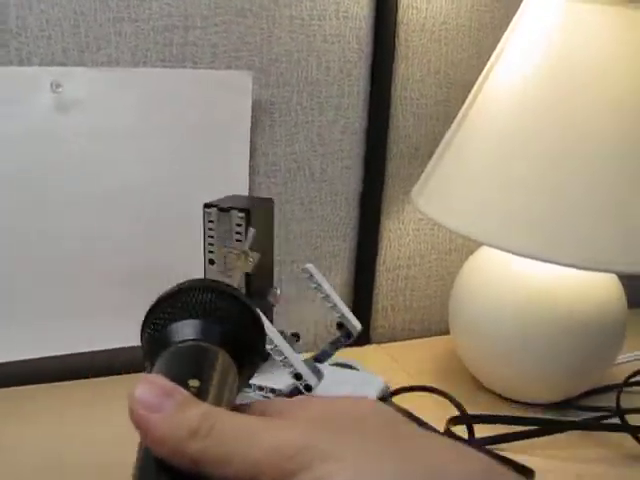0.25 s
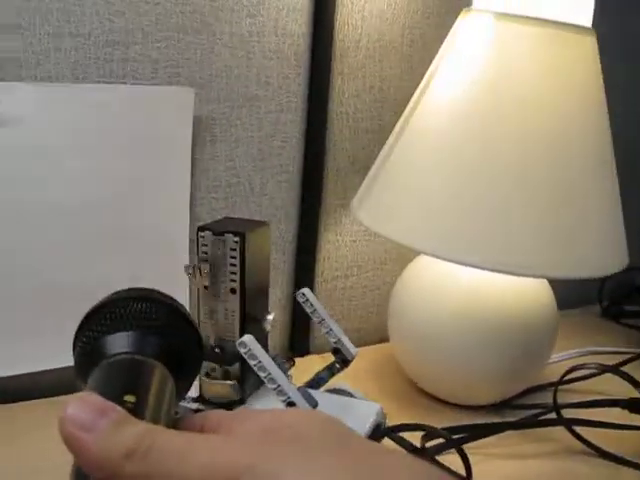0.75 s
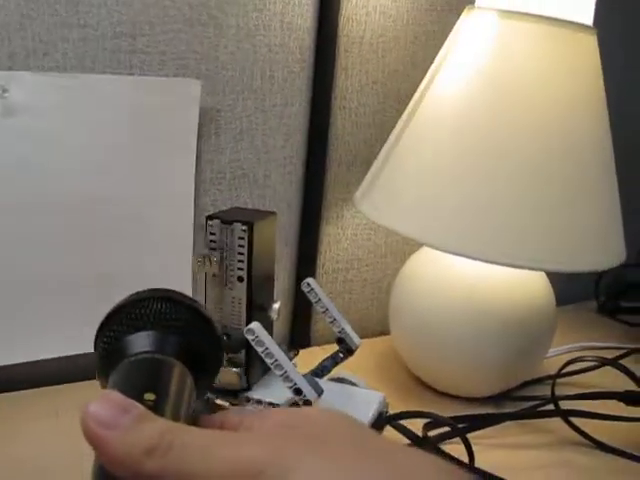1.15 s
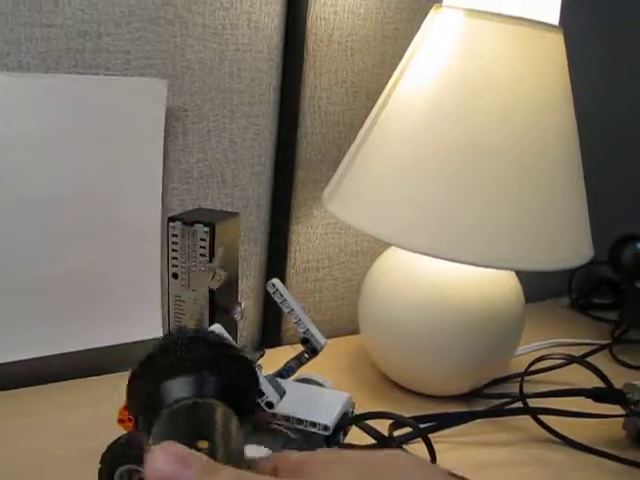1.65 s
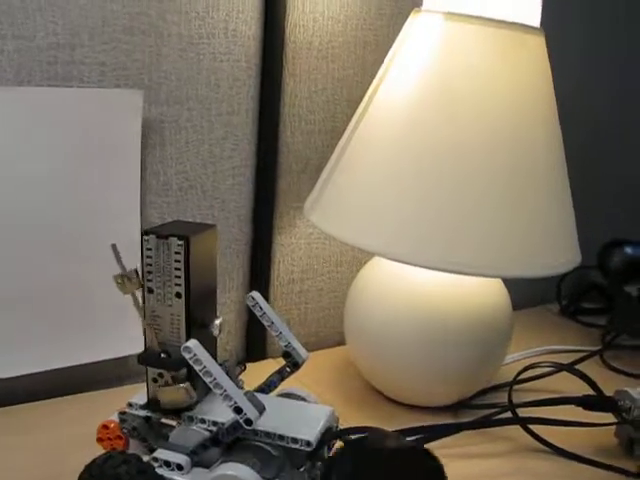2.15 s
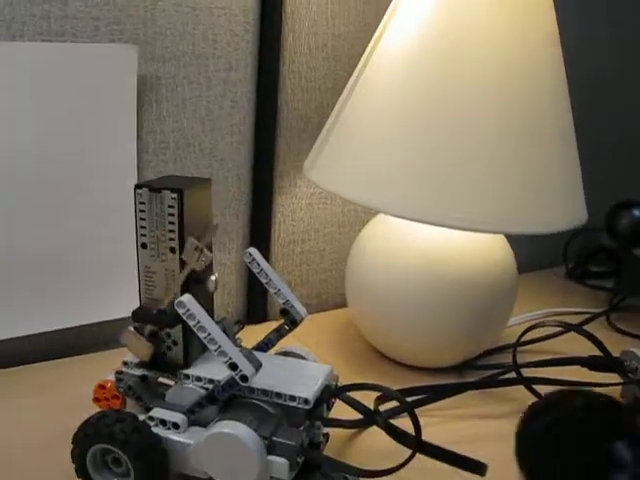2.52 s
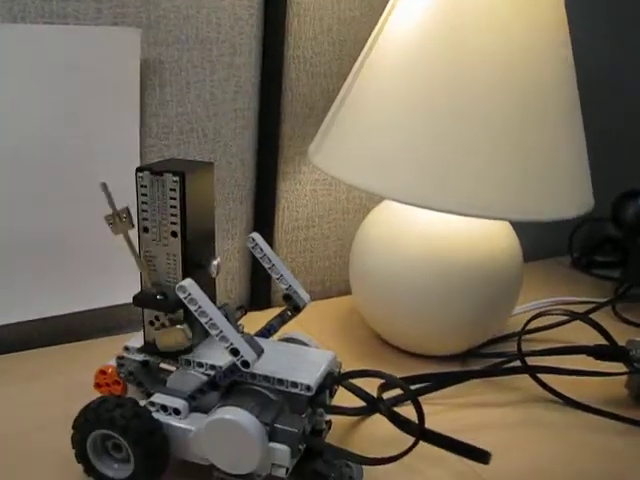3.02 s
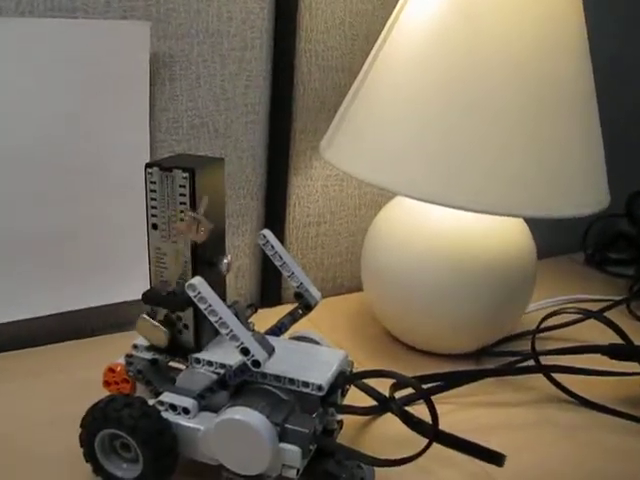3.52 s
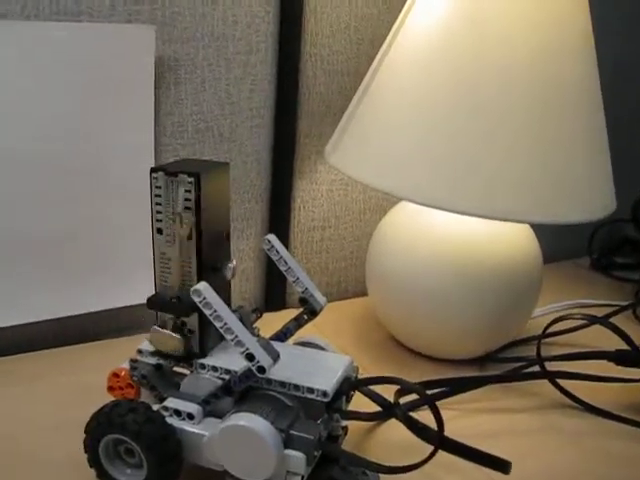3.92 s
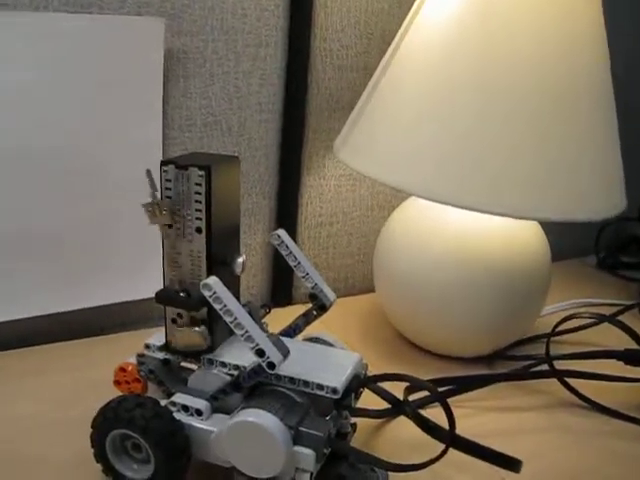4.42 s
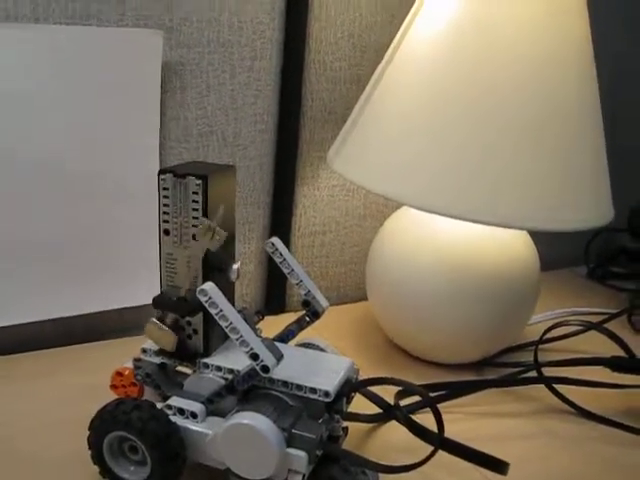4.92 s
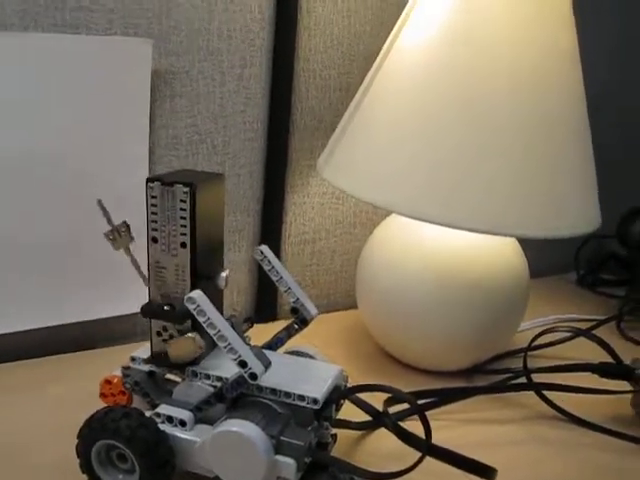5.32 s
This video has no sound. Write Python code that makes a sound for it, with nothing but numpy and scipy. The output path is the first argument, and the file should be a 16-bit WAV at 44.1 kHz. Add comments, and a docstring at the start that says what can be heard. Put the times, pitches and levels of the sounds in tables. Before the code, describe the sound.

A mechanical metronome ticks evenly in a quiet office while a small robot's geared motors rattle briefly and run down.

```python
"""A quiet office, where a small plastic robot rolls over a desk with a wind-up metronome on top.
Each escapement stroke excites the damped modes of the metronome's case: a slightly lopsided tick.
Tooth impacts in the robot's two geared motors force its chassis to rattle; they run down and stop
within the first second. A hand adds faint knocks and bumps, and ventilation noise and the hum
of beating fans lie under it all."""
import sys
import numpy as np
from scipy import signal
from scipy.fft import rfft, irfft
from scipy.io import wavfile
from scipy.ndimage import uniform_filter1d

SR = 44100
rng = np.random.default_rng(int(sys.argv[2]) if len(sys.argv) > 2 else 0)


def store_pcm(level_fs):
    """Save levels as 16-bit WAV."""
    pcm = np.round(np.clip(level_fs, -1, 1) * 32767).astype(np.int16)
    wavfile.write(sys.argv[1], SR, np.atleast_2d(pcm).T)


N = 245195
TIME = np.arange(N) / SR
DRIVE_TIME = TIME[:SR]  # the first second, in which the motors run


def gain_of(db):
    """Amplitude ratio of a level in decibels."""
    return 10 ** (np.asarray(db) / 20)


def unit_rms(x):
    """Normalisation to rms 1."""
    return x / np.sqrt(np.mean(x ** 2) + 1e-20)


def value_at(points, hz):
    """Interpolation on a logarithmic frequency axis."""
    f, value = np.transpose(points)
    return np.interp(np.log(hz + 1), np.log(f + 1), value)


def add(mix, start_s, sound):
    """Superposition of a sound on the mix."""
    part = mix[max(round(start_s * SR), 0):][:len(sound)]
    part += sound[:len(part)]


def decay(t, t60):
    """Exponential damping: 60 dB in t60 seconds."""
    return np.exp(-np.log(1000) * t / t60)


def coloured(x, spectrum):
    """Spectral shaping, at rms 1."""
    gain = gain_of(value_at(spectrum, np.fft.rfftfreq(len(x), 1 / SR)))
    return unit_rms(irfft(rfft(x) * gain, len(x)))


def resonate(x, hz, width_hz):
    """Heterodyne resonance of gain 1 that can glide: shift to 0 Hz, smooth twice, shift back."""
    carrier = np.exp(2j * np.pi * np.cumsum(hz * np.ones(len(x))) / SR)
    pole = np.exp(-2 * np.pi * width_hz / SR)
    baseband = signal.lfilter([(1 - pole) ** 2], np.poly([pole, pole]), x / carrier + 1e-18)
    return 2 * (carrier * baseband).real


def filtered(x, hz, kind, order=2):
    """Maximally flat low-pass or high-pass."""
    return signal.sosfilt(signal.butter(order, min(hz, SR / 2 - 1), kind, fs=SR, output="sos"), x)


def wander(samples):
    """Slow random modulation: one second of twice-averaged noise at rms 1."""
    noise = rng.standard_normal(len(DRIVE_TIME))
    return unit_rms(uniform_filter1d(uniform_filter1d(noise, samples), samples))


# escapement strokes: t/s, level/dB, relative level of the pendulum weight's ring/dB
STROKES = [(0.2509, -2, -49.5), (0.8036, -1, -31.5), (1.3115, -1.8, -57), (1.8906, -1.5, -46),
           (2.3979, -1.34, -49.5), (2.9764, -2, -44.5), (3.4891, -1.5, -27.5), (4.0648, -1.8, -46),
           (4.5816, -2.5, -48.5), (5.1553, -1.5, -27)]
# first hard snap of a stroke: f/Hz, level/dB, duration/s
SNAP_PULSES = [(3371, -7.5, 0.0012), (5443, -12, 0.002)]
# modes of the case and works: f/Hz, level/dB, T60/s
CASE_MODES = [(1215, -14, 0.017), (1313.5, -8, 0.015), (1368, -17, 0.019), (2085, -19.5, 0.033),
              (2065, -22, 0.017), (2384, -10, 0.0074), (2563, -14.5, 0.013), (2916, -57.5, 0.013),
              (3074, -16, 0.01), (3414, -14, 0.0094), (3620, -29.5, 0.011), (3770, -23.5, 0.0255),
              (3810, -11.5, 0.0081), (4760, -18, 0.024), (4965, -4.5, 0.0046), (5200, -37.5, 0.027),
              (5264, -19.5, 0.014), (5500, -5.5, 0.007), (6170, -22.5, 0.0085), (6750, -36.5, 0.026),
              (7190, -26.5, 0.02), (8480, -30, 0.014), (8900, -31, 0.022), (9300, -25.5, 0.0059),
              (10060, -39.5, 0.025), (11020, -38, 0.0169), (12140, -34.5, 0.021), (14000, -36.5, 0.007)]
# friction of the pallet on the escape wheel: f/Hz, relative spectral level/dB
SCRAPE_SPECTRUM = [(200, -24.5), (600, -14), (850, -4.5), (1600, -13.5), (2500, 6.5), (5000, 0.5),
                   (7000, 0.5), (11000, -6.5), (16000, -19)]


def metronome(scatter_db=0.07, detune=0.0038, weight_hz=2046, scrape_db=-26):
    """Impact excitation: each stroke snaps, scrapes and rings damped modes, never quite alike."""
    out, t = np.zeros(N), np.arange(SR // 8) / SR
    snap = sum(gain_of(db) * np.sin(np.pi * np.minimum(t / length, 1)) ** 2 * np.sin(2 * np.pi * hz * t)
               for hz, db, length in SNAP_PULSES)
    hz, db, t60 = np.transpose(CASE_MODES)[:, :, None]
    polarity = (-1) ** np.arange(len(CASE_MODES))[:, None]  # neighbouring modes radiate in antiphase
    for start_s, stroke_db, weight_db in STROKES:
        louder, sharper = rng.standard_normal((2, len(CASE_MODES), 1))
        envelopes = gain_of(db + scatter_db * louder) * decay(t, t60)
        modes = polarity * envelopes * np.sin(2 * np.pi * hz * (1 + detune * sharper) * t)
        weight = gain_of(weight_db) * decay(t, t60=0.062) * np.sin(2 * np.pi * weight_hz * t)
        friction = coloured(rng.standard_normal(len(t)), SCRAPE_SPECTRUM)
        scrape = gain_of(scrape_db) * friction * decay(t, t60=0.036)
        ring = filtered(snap + modes.sum(0) - weight, 1000, "highpass")  # a small box radiates no bass
        tick = reflections(ring + scrape, db=-15, t60=0.034, delay_s=0.0018)
        add(out, start_s, gain_of(stroke_db) * tick)
    return out


START_RATE_HZ, TOP_RATE_HZ = 510, 600  # teeth meeting per second
FASTEST_S, COAST_S, STOP_S = 0.14, 0.338, 0.63  # at COAST_S the power is cut and the wheels run on


def tooth_rate(run_down_power=0.68):
    """Meshing frequency in Hz: a short rise, then friction slows the drive ever more steeply."""
    rising = np.interp(DRIVE_TIME, [0, FASTEST_S], [START_RATE_HZ, TOP_RATE_HZ])
    share_left = np.clip((STOP_S - DRIVE_TIME) / (STOP_S - FASTEST_S), 0, 1)
    return rising * share_left ** run_down_power


def gear_train(rate, wobble=0.025, uneven_db=3, chatter_gain=0.11, slide_gain=0.14):
    """Impact and friction: uneven tooth blows shake loose parts, and the flanks slide in between."""
    force, hiss = rng.standard_normal((2, len(rate)))
    teeth_passed = np.cumsum(rate * (1 + wobble * wander(samples=150))) / SR
    blows = np.diff(np.floor(teeth_passed), prepend=0) * gain_of(uneven_db * np.clip(force, -2, 2))
    chatter = signal.oaconvolve(blows, decay(TIME[:SR // 20], t60=0.0033))[:len(rate)]
    return blows + (chatter_gain * chatter + slide_gain * np.sqrt(rate / rate[0])) * hiss


# plastic gearboxes and chassis: f/Hz, bandwidth/Hz, relative level driven/dB, the same coasting/dB
CHASSIS_MODES = [(756, 46, -25, -14), (1493, 91, 0, 5.5), (2055, 120, -11, -1), (2760, 330, -2, -1),
                 (4030, 130, -1.5, 4.5), (4350, 156, -2, 8.5), (4850, 220, 0.5, -4), (5550, 170, -20, -0.5),
                 (6250, 140, -2, 4), (6830, 500, -1.5, -2.5), (7380, 1900, -7.5, -6.5),
                 (10010, 360, 0.5, 1.5), (10200, 320, 1.5, -6), (11600, 1200, -18, -13)]


def chassis(teeth, flex=0.0029, flicker_db=2.0):
    """Forced vibration: the teeth ring the flexing frame; other modes lead once the gears go slack."""
    slack = np.clip((DRIVE_TIME - COAST_S) / 0.05 + 0.5, 0, 1)
    out = np.zeros(len(teeth))
    for k, (hz, width_hz, driven_db, coasting_db) in enumerate(CHASSIS_MODES):
        db = driven_db + slack * (coasting_db - driven_db) + flicker_db * wander(samples=900)
        flexed_hz = hz * (1 + flex * wander(samples=1500))
        out += (-1) ** k * gain_of(db) * resonate(teeth, flexed_hz, width_hz)
    return unit_rms(out)


def rattle_envelope(rate, db=-37.5, cut_db=-3.5, rebound_db=-5.5, fade_power=1.4):
    """Backlash: the rattle follows the speed and dips as teeth part, at the power cut and after jolts."""
    dip_db = cut_db * np.exp(-((DRIVE_TIME - COAST_S) / 0.044) ** 2)
    for start_s, _, length, _ in GEAR_JOLTS:
        rebound_s = start_s + length + 0.017
        dip_db += rebound_db * np.exp(-((DRIVE_TIME - rebound_s) / 0.0083) ** 2)
    fade_below_hz = 0.58 * TOP_RATE_HZ
    return gain_of(db + dip_db) * np.tanh((rate / fade_below_hz) ** fade_power)


# grinding of the gears: f/Hz, relative spectral level/dB
GRIND_SPECTRUM = [(300, -25.5), (550, -31), (720, -12.5), (1050, -22), (1450, -8), (1800, -9.5), (2500, -4),
                  (4400, -5.5), (6500, -7.5), (9000, -30), (10500, -12.5), (11200, -18.5), (14500, -24),
                  (16000, -42)]
# whine of the mesh: multiple of the tooth rate, level re the rattle at the starting speed/dB
MESH_HARMONICS = [(4, -20), (5, -21), (9, -19.5)]
# gears jolting across their play: t/s, level/dB, duration/s, resonance f/Hz
GEAR_JOLTS = [(0.008, -31.5, 0.016, 1503), (0.027, -32.5, 0.038, 4285), (0.086, -37, .043, 2390)]


def motors(grind_db=-5, slower_ratio=0.87, dull_hz=3000, treble_power=1.28, jolt_ring=0.89):
    """Gear noise: one train rings the chassis, a slower one grinds; they jolt, and dull as they slow."""
    rate = tooth_rate()
    pace = rate / rate[0]
    ring = chassis(gear_train(rate))
    grind = gain_of(grind_db) * coloured(gear_train(slower_ratio * rate), GRIND_SPECTRUM)
    rattle = unit_rms(ring + grind)
    for multiple, db in MESH_HARMONICS:
        whine = resonate(rng.standard_normal(len(rate)), multiple * rate, width_hz=30)
        rattle += gain_of(db) * pace * unit_rms(whine)
    dull = filtered(rattle, dull_hz, "lowpass", order=1)
    out = (dull + pace ** treble_power * (rattle - dull)) * rattle_envelope(rate)
    for start_s, db, length, hz in GEAR_JOLTS:
        clatter = coloured(rng.standard_normal(SR // 8), GRIND_SPECTRUM)
        jolt = unit_rms(clatter + jolt_ring * unit_rms(resonate(clatter, hz, width_hz=90)))
        window = signal.windows.tukey(int(length * SR), 0.4)
        add(out, start_s, gain_of(db) * jolt[:len(window)] * window)
    return np.pad(reflections(out, db=-14.5, t60=0.018, delay_s=0.0058), (0, N - len(out)))


# light knocks on plastic: t/s, level/dB, T60/s, treble cutoff f/Hz
HAND_KNOCKS = [(0.717, -59.5, 0.055, 3940), (1.7095, -50, 0.11, 3520), (3.536, -51.5, 0.016, 6040),
               (4.0283, -50, 0.056, 1316)]
# a hand shifting its grip: t/s, level/dB, duration/s
GRIP_BUMPS = [(0.634, -55, 0.061), (0.857, -61.5, 0.13), (1.025, -61, 0.065), (1.143, -58.5, .06)]


def handling(low_cut_hz=700, bump_hz=223):
    """Heavily damped impacts: knocks are short bursts of broadband noise, bumps a low narrow band."""
    out, t = np.zeros(N), np.arange(SR // 4) / SR
    for start_s, db, t60, hz in HAND_KNOCKS:
        noise = filtered(rng.standard_normal(len(t)), hz, "lowpass", order=1)
        softened = filtered(noise, 2 * hz, "lowpass", order=1)
        knock = unit_rms(filtered(softened, low_cut_hz, "highpass"))
        add(out, start_s, gain_of(db) * knock * decay(t, t60))
    for start_s, db, length in GRIP_BUMPS:
        bump = unit_rms(resonate(rng.standard_normal(len(t)), bump_hz, width_hz=55))
        window = np.hanning(int(length * SR))
        add(out, start_s, gain_of(db) * bump[-len(window):] * window)
    return out


def echo_taps(samples, density=0.1):
    """Diffuse scattering: sparse echoes of random sign."""
    return rng.choice([-1., 1.], samples) * (rng.random(samples) < density)


def reflections(x, db, t60, delay_s):
    """Early reflections from the desk, lamp and partitions join the direct sound."""
    t = TIME[:SR // 12]
    response = echo_taps(len(t)) * decay(t, t60) * np.clip(t / delay_s - 1, 0, 1)
    return x + gain_of(db) * signal.oaconvolve(x, response / np.linalg.norm(response))[:len(x)]


# reverberation time of the padded office: f/Hz, T60/s
REVERB_TIMES = [(300, 0.35), (1300, 0.14), (3500, 0.1208), (7000, 0.096), (15000, 0.12)]


def reverberation(x, db=-25, delay_s=0.0062):
    """Absorption varies with frequency: the room's faint tail dies soonest in the treble."""
    t = TIME[:SR // 3]
    hz, frame_s, bands = signal.stft(echo_taps(len(t)), SR, nperseg=256)
    damped = bands * decay(frame_s, value_at(REVERB_TIMES, hz)[:, None])
    tail = signal.istft(damped, SR, nperseg=256)[1][:len(t)] * np.clip(t / delay_s - 1, 0, 1)
    return gain_of(db) * signal.oaconvolve(x, tail / np.linalg.norm(tail))[:N]


# ventilation noise: f/Hz, relative spectral level/dB
AIR_SPECTRUM = [(15, -5), (40, -5), (75, -5.5), (140, -10), (230, -12.5), (400, -17), (800, -20.5),
                (2300, -27.5), (5000, -32), (8000, -36), (13700, -41), (15800, -48.5)]
# fan and mains tones: f/Hz, rms level/dB, bandwidth/Hz
HUM_BANDS = [(21.19, -61, 4.3), (40, -69.5, 6), (62, -64, 8), (358, -82, 6.4), (605, -80.5, 0.59),
             (4975, -86.5, 53)]


def fans(air_db=-60, fan_hz=111.3, fan_db=-62, second_fan_db=-67, beat_s=1.38, in_phase_s=0.7):
    """Interference: two fans of nearly equal speed beat, over air noise and wavering narrow-band hums."""
    hz, t = np.fft.rfftfreq(N, 1 / SR), TIME - in_phase_s
    out = gain_of(air_db) * coloured(rng.standard_normal(N), AIR_SPECTRUM)
    for centre_hz, db, width_hz in HUM_BANDS:
        peak = 1 / (1 + (2 * (hz - centre_hz) / width_hz) ** 2)
        out += gain_of(db) * unit_rms(irfft(rfft(rng.standard_normal(N)) * peak, N))
    out += gain_of(fan_db) * unit_rms(np.cos(2 * np.pi * fan_hz * t))
    return out + gain_of(second_fan_db) * unit_rms(np.cos(2 * np.pi * (fan_hz - 1 / beat_s) * t))


def scene():
    """Superposition of the sources on the desk, their reverberation and the fans."""
    desk = metronome() + motors() + handling()
    return (desk + reverberation(desk) + fans())[None]


def record(dry, ceiling=0.51, band_limit_hz=15800):
    """Soft saturation in the microphone rounds the peaks of the ticks; a low-pass limits the band."""
    rounded = ceiling * np.tanh(dry / ceiling)
    lowpass = signal.firwin(511, band_limit_hz, window=("kaiser", 9), fs=SR)
    return signal.oaconvolve(rounded, lowpass[None], "same")


dry = scene()
out = record(dry)
store_pcm(out)
```